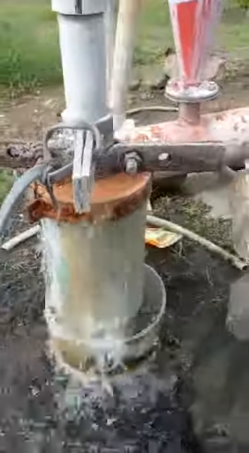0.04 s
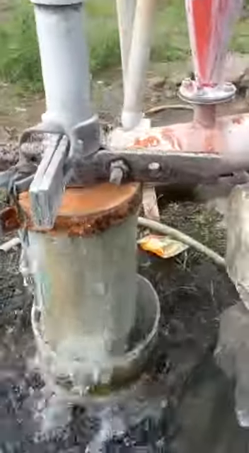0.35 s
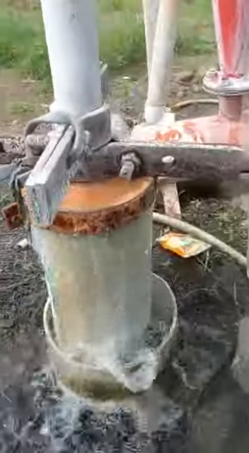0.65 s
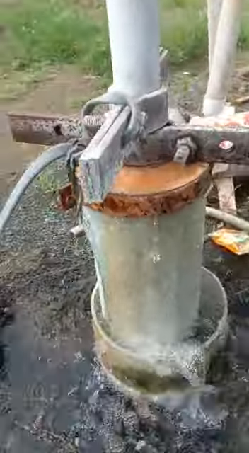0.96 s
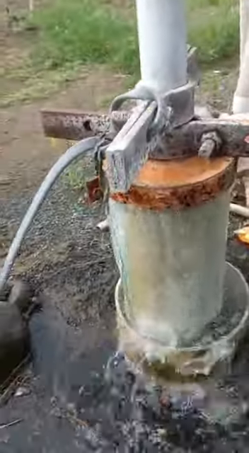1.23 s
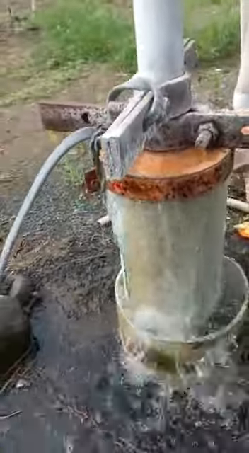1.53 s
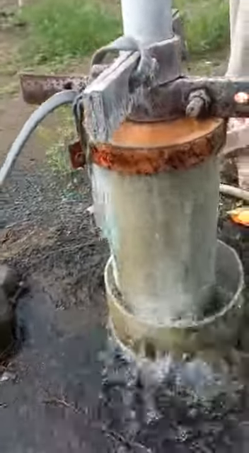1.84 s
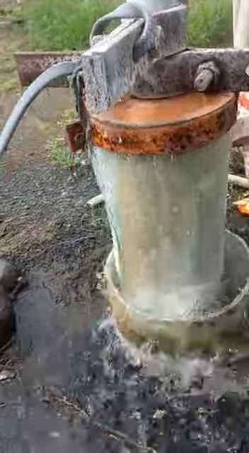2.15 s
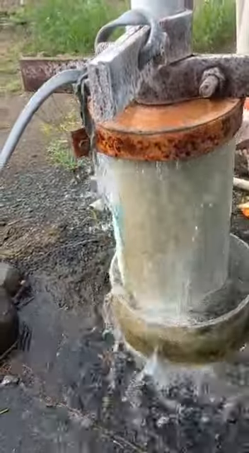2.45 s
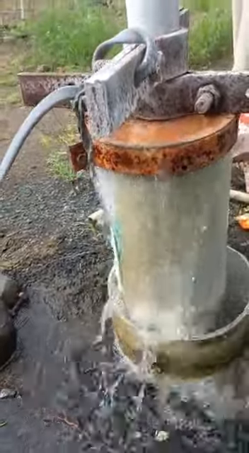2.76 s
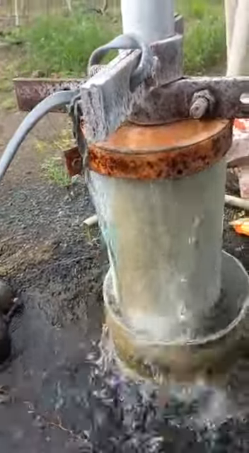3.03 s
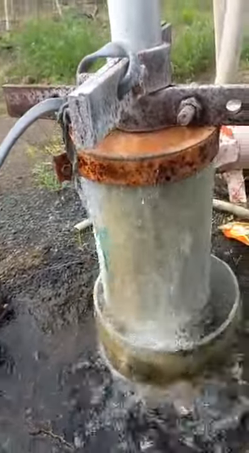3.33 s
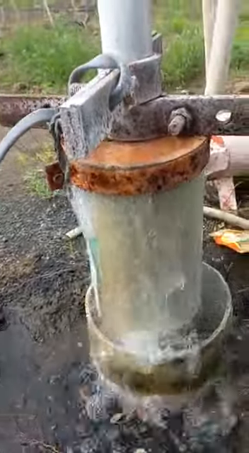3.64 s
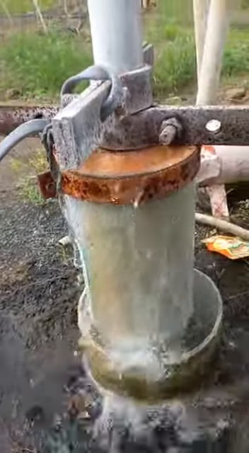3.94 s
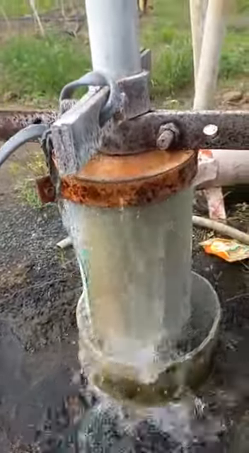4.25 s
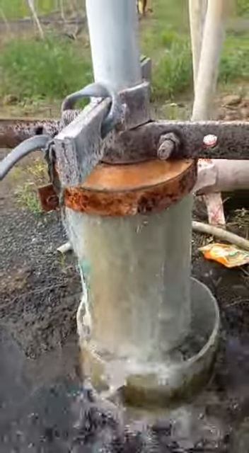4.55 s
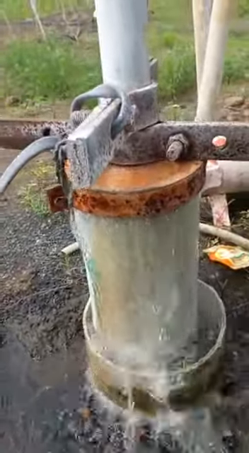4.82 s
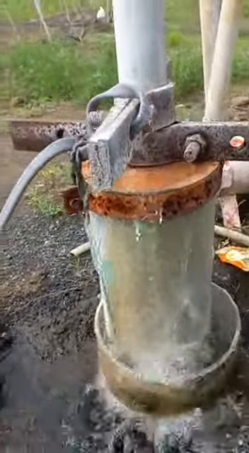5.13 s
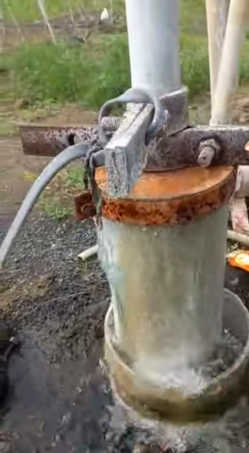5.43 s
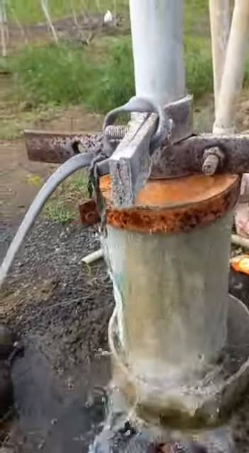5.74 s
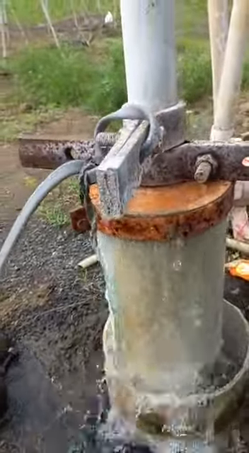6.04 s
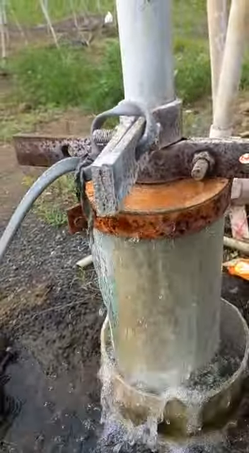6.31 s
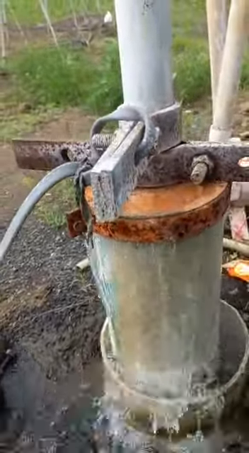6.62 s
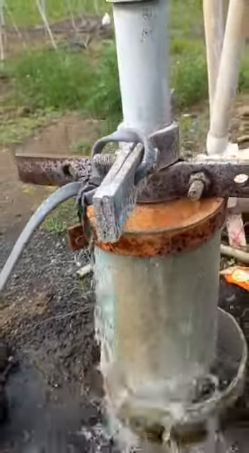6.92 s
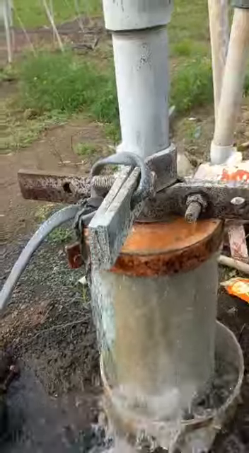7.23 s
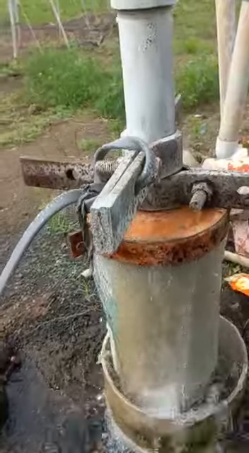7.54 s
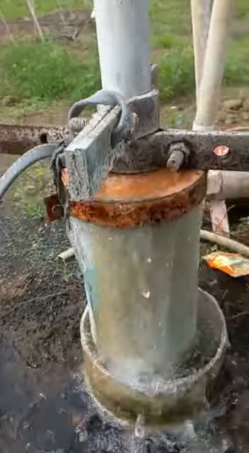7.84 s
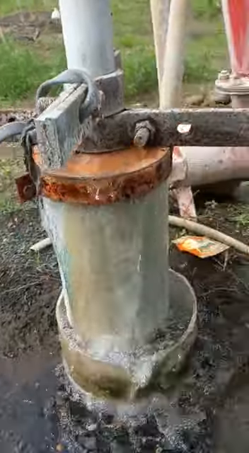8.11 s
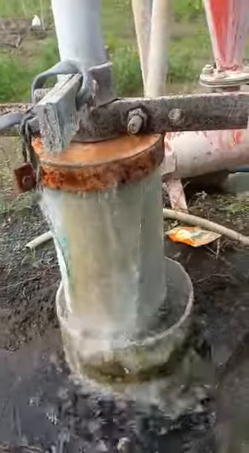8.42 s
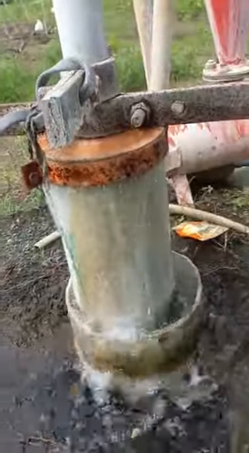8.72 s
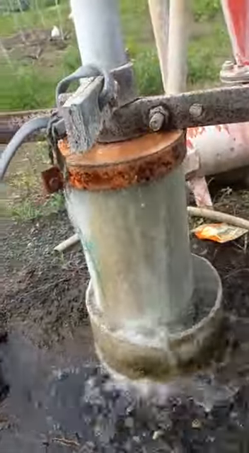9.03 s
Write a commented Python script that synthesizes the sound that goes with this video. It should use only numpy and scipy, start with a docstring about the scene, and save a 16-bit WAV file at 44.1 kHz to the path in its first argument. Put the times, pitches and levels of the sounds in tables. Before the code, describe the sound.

Water overflows from a well pipe and splashes onto wet ground for the whole nine seconds or so, close to a hand-held microphone outdoors. It is a bright, irregular trickle and spatter with small surges, over a soft hollow gurgle from the collar at the pipe's foot. Heavier splashes, sharp drips and small ringing bubbles are scattered throughout, clustering around 2 seconds and between 4 and 5.5 seconds. Wind buffets the microphone with low rumble and dull thumps in the first half second, then drops back. It returns strongly at about 2.4 seconds, flutters on through the middle, and hits hard again around 5.7 to 6.1 seconds. Weaker gusts follow until about 7.5 seconds. From 7 seconds to the end, low plops and brighter bubbles become more frequent as the splashing continues.

```python
"""Water wells out under the cap of a borewell casing, gurgles in the collar at its foot and spills onto
wet ground. It lands in uneven slugs that burst into droplets and trap small bubbles; now and then a fat
drop slaps down. Each impact is a broadband click, and each bubble rings at a pitch set by its size.
Outdoors, turbulent gusts buffet the two ports of a hand-held microphone that moves about the pipe."""
import sys
import numpy as np
from scipy import signal
from scipy.fft import rfft, irfft, next_fast_len
from scipy.io import wavfile
from scipy.ndimage import uniform_filter1d, map_coordinates

SR = 44100
rng = np.random.default_rng(int(sys.argv[2]) if len(sys.argv) > 2 else 0)


def generate_wav(sig):
    """Save sig (samples, or channels by samples) to the path in sys.argv[1] as 16-bit PCM at SR."""
    pcm = np.round(np.clip(np.atleast_2d(sig).T, -1, 1) * 32767).astype(np.int16)
    wavfile.write(sys.argv[1], SR, pcm)


N = 404397

# Levels in the tables are relative: each source adds its own gain.
# the spill swells and fades as the microphone moves: t/s, splash/dB, spatter/dB, spray/dB
SPILL_LEVELS = [(0.0, -49.5, -51, -57.5), (0.43, -47, -50, -53.5), (0.89, -52.5, -53, -60.5),
                (1.17, -52.5, -53, -57.5), (1.48, -47, -48.5, -51.5), (2.02, -41.5, -42.5, -51.5),
                (2.73, -47, -47.5, -51.5), (3.45, -47, -48.5, -54), (4.11, -43.5, -46, -50.5),
                (4.49, -47, -46, -53), (5.26, -44.5, -45.5, -50.5), (5.72, -44.5, -46.5, -52.5),
                (6.49, -49.5, -51.5, -56.5), (7.07, -49.5, -50.5, -55), (7.46, -45, -46.5, -51),
                (8.66, -44, -45.5, -52.5), (9.17, -46, -44.5, -51.5)]
# water surges over the rim of the collar: t/s of the crest, rise/dB
RIM_SURGES = [(0.26, 2.5), (0.69, 1.5), (0.969, 4), (1.464, 5.5), (1.89, 1.5), (2.04, 4.5), (2.13, 3),
              (2.22, 2), (2.45, 3), (2.74, 5), (3.07, 6), (3.14, 5.5), (3.63, 0), (3.93, 1.5), (4.041, 3.5),
              (4.11, 2.5), (4.37, 0), (4.63, -1.5), (4.96, 1), (5.11, 5), (5.36, 7), (5.628, 3.5),
              (5.78, 3), (6.14, 5), (6.58, -2), (6.82, 6), (6.922, 5.5), (7.1, 6.5), (7.26, 4.5),
              (7.52, 2.5), (7.6, 2.5), (7.88, 0.5), (7.99, 2.5), (8.21, 2.5), (8.42, 0.5), (8.685, 4),
              (9.0, 2.5), (9.08, 3)]
# spectrum of splashing water: f/Hz, level/dB
SPLASH_SPECTRUM = [(500, -27), (1000, 2), (1350, 7), (1600, 2.5), (2200, 1.5), (3100, 0), (4000, -9.5),
                   (6700, -8), (7500, -13), (8100, -13), (9500, -3), (12800, 6), (14500, 1), (16000, 6)]
# how much sooner the spill reaches the right port: t/s, lead/ms
SPILL_LEAD = [(0, 0.1), (1, 0.1), (2, 0.038), (3, 0.066), (4, 0.1), (5, 0.08), (6, 0.13), (7.3, 0.15),
              (8, 0.11), (9.17, 0.072)]
# the reflection off the wet ground comes sooner as the microphone dips: t/s, delay/ms
ECHO_DELAY = [(0, 1.7), (1.2, 2.3), (1.75, 1.96), (2.3, 1.74), (3.3, 1.85), (5.1, 2.02), (6.8, 1.65),
              (7.9, 2.08), (9.17, 1.67)]
# heavy slugs slop into the puddle and trap air: t/s, splash/dB, bubble level/dB, bubble f/Hz
HEAVY_SLUGS = [(0.951, -21, -28, 2880), (1.2416, -22, -41, 1720), (1.713, -39, -26, 3030),
               (1.8014, -14, -26, 2930), (1.923, -18, -29, 2350), (2.023, -18, -25, 3450),
               (2.21, -29, -23, 2900), (2.2283, -32, -28, 2285), (2.819, -19, -43, 1505),
               (3.623, -17, -26, 1750), (3.667, -26, -34, 2390), (3.827, -38, -31, 1910),
               (4.238, -12, -27, 2150), (4.409, -40, -26, 3650), (4.695, -30, -27, 3400),
               (4.915, -11, -35, 1760), (5.022, -29, -21.5, 3300), (5.109, -27, -25, 3260),
               (5.502, -12, -38, 3180), (7.175, -39, -31, 2000), (7.601, -28, -31, 1460),
               (7.863, -21, -27, 1760), (8.197, -29, -31, 2590), (8.292, -33, -28, 2640),
               (8.328, -35, -24.5, 2920), (8.418, -35, -26, 2840), (8.52, -30, -25.5, 3180),
               (8.691, -29, -25, 2500), (8.753, -17.5, -28, 1910), (8.813, -26, -25, 2700),
               (9.002, -22, -23, 3120), (9.068, -12, -35, 1950)]
# fat drops slap down: t/s, treble/dB, body/dB, lead at the right port/ms
FAT_DROPS = [(0.2609, -49.0, -25, -0.09), (0.3645, -31, -34, 0.09), (0.6853, -34, -43, 0.11),
             (0.97, -32, -34, 0.11), (1.3781, -30, -32, 0.09), (1.668, -46, -33, 0.07),
             (1.88, -23, -23, 0.18), (1.9091, -30, -26, 0.05), (2.0087, -25, -36, 0.07),
             (2.0238, -21, -20, 0.09), (2.0691, -25, -31.0, 0.07), (2.1162, -24, -29, 0.05),
             (2.1941, -18, -26, 0.05), (2.2324, -29, -25, 0.05), (2.253, -45, -24, 0.05),
             (2.3468, -23, -20, 0.02), (2.5633, -26, -44, 0.32), (2.5959, -26, -41, 0.2),
             (3.0196, -37, -28, 0.14), (3.1248, -27, -32.0, 0.11), (3.3172, -38, -35.0, 0.14),
             (3.409, -28, -46, 0.09), (3.7325, -24.0, -33, 0.09), (4.0242, -14.5, -21, 0.11),
             (4.0468, -24.0, -45.0, 0.0), (4.224, -53.0, -26, 0.09), (4.2619, -25, -49.0, 0.02),
             (4.3208, -37.0, -24, 0.18), (4.3616, -25, -25, 0.16), (4.5593, -57.0, -27.5, 0.11),
             (4.625, -33, -27, 0.09), (4.715, -24.0, -40.0, 0.11), (4.8089, -28, -50.0, 0.09),
             (5.3622, -30, -21, 0.18), (5.4786, -29, -35, 0.09), (5.6198, -28, -29, 0.14),
             (5.6369, -34.0, -27, 0.2), (5.9904, -25, -43.0, 0.11), (6.0767, -29, -34.0, 0.14),
             (6.4238, -40, -45, 0.14), (6.591, -31, -38, 0.14), (6.859, -40.0, -32, 0.14),
             (7.1068, -24, -37, 0.16), (7.325, -25, -29, 0.2), (7.505, -23, -51.0, 0.14),
             (7.682, -22, -30.0, 0.18), (7.8754, -29, -25, 0.09), (7.8963, -51.0, -28, 0.16),
             (7.9846, -18, -27, 0.14), (8.0088, -22.0, -31.0, 0.14), (8.0461, -27, -34, 0.23),
             (8.3448, -31, -32, 0.09), (8.4165, -50.0, -24.0, 0.09), (9.0277, -27, -44, 0.14),
             (9.1396, -30, -32, 0.11)]
# water churns in the collar: t/s, level/dB
CHURN_LEVEL = [(0, -49), (.8, -55.5), (1.3, -52), (1.7, -48.5), (2.1, -44.5), (3, -48.5), (4, -46.5),
               (5, -46.5), (5.6, -50.5), (6.4, -51), (7.2, -52.5), (7.7, -48.5), (8.2, -47.5), (8.7, -44.5),
               (9.17, -47.5)]
# cavity modes of the collar: f/Hz, bandwidth/Hz, level/dB
COLLAR_MODES = [(308.6, 134, -2.5), (524, 64, 1.5), (743, 65, 1), (1021, 37, -0.5), (1513, 70, -7.5),
                (1935, 69, -5.5)]
# big air pockets plop in the collar: t/s, level/dB, f/Hz
AIR_POCKETS = [(0.883, -53, 990), (1.058, -31.5, 1400), (1.084, -32.5, 870), (1.475, -29.5, 780),
               (1.659, -37, 524), (1.801, -51, 1070), (4.096, -26, 1200), (6.384, -28, 1340),
               (7.103, -29.5, 1060), (7.25, -26, 1300), (7.601, -30, 580), (7.645, -31, 1000),
               (7.974, -30.5, 563), (8.153, -32, 730), (8.227, -31, 547), (8.291, -32.5, 524),
               (8.415, -33, 664), (8.519, -39, 708), (8.604, -26, 1020), (8.78, -28, 1030),
               (9.072, -33, 1480)]
# gusts reach the ports: t/s, duration/s, level/dB, depth (extra gain of the low rumble)/dB
WIND_GUSTS = [(-0.04, 0.067, -26.5, -16), (0.029, 0.053, -20.5, -10), (0.105, 0.042, -20.5, -5),
              (0.183, 0.13, -33.5, -4), (0.279, 0.16, -31, -7.5), (0.468, 0.048, -30.5, -9),
              (0.577, 0.05, -51.5, 2), (1.132, 0.057, -43, 1.5), (1.233, 0.09, -48.5, -2),
              (1.357, 0.044, -41, 0), (1.443, 0.14, -52, -4), (1.813, 0.16, -39.5, 1),
              (2.119, 0.071, -34.5, 3), (2.262, 0.027, -31.5, -1), (2.359, 0.17, -25.5, -3.5),
              (2.542, 0.14, -28, -1), (2.735, 0.21, -39, 2), (2.907, 0.29, -35, -6),
              (3.285, 0.32, -34.5, -6), (3.51, 0.29, -31.5, -3), (3.823, 0.11, -30.5, -1.5),
              (3.981, 0.12, -28, -1), (4.133, 0.12, -33, -9), (4.236, 0.052, -27, -6),
              (4.304, 0.11, -30.0, -6), (4.435, 0.15, -31, -8.5), (4.6, 0.15, -37.5, -1),
              (4.834, 0.063, -39, 0), (4.917, 0.14, -34, 1.5), (5.091, 0.062, -26, -8),
              (5.174, 0.14, -38, -2.5), (5.42, 0.19, -32, -2), (5.695, 0.098, -26.5, -3.5),
              (5.795, 0.18, -22, -4.5), (5.994, 0.1, -25, -6), (6.18, 0.086, -43, -4.5),
              (6.386, 0.13, -44.5, -13), (6.684, 0.15, -37.5, -7.5), (6.869, 0.23, -35, -7),
              (7.148, 0.27, -39, -10), (7.382, 0.045, -33.5, 7.5), (7.522, 0.027, -48.5, 7),
              (7.757, 0.04, -59.5, 6), (8.718, 0.076, -45, 6), (8.862, 0.05, -53, 3),
              (9.01, 0.038, -45.5, 4)]
# spectrum of a moderate gust: f/Hz, level/dB
GUST_SPECTRUM = [(25, -9), (45, -11.5), (78, 4), (105, 8.5), (160, 1), (250, 1.5), (380, 2.5), (520, -4),
                 (700, -25), (1000, -24), (1500, -46), (2200, -50)]
# growth of the rumble with the level of the gust: f/Hz, slope/(dB per dB)
RUMBLE_GROWTH = [(30, 0.5), (100, 0.85), (200, 0.99), (400, 1.3), (700, 1.96), (1500, 2)]
# single hard eddies: t/s, level/dB
HARD_EDDIES = [(0.044, -12), (0.058, -1.5), (0.071, 0), (0.079, -5), (0.089, -5), (0.119, -3.5),
               (0.131, -6.5), (0.147, -6.5), (0.206, -11), (0.229, -16.5), (0.399, -14), (0.49, -16),
               (1.171, -31), (2.426, -3), (2.438, -5), (2.469, -5.5), (2.491, -11), (2.503, -12),
               (2.512, -12), (2.528, -17), (2.663, -15), (2.67, -9), (2.882, -13.5), (2.89, -21),
               (3.468, -17.5), (3.506, -14.5), (3.601, -12.5), (3.672, -15), (3.712, -14), (3.739, -8.5),
               (3.889, -12.5), (3.917, -10), (4.034, -12.5), (4.044, -12), (4.063, -14), (4.09, -12),
               (4.112, -15), (4.161, -17), (4.262, -22), (4.279, -21), (4.291, -15), (4.332, -16),
               (4.395, -16), (4.408, -18), (4.95, -18), (5.016, -15), (5.145, -10), (5.462, -16),
               (5.71, -13.5), (5.725, -20), (5.755, -10), (5.783, -5.5), (5.803, -20), (5.831, -1),
               (5.84, -4.5), (5.871, -8), (5.879, -0.5), (5.906, -14), (5.92, -4), (5.931, -8),
               (5.942, -2.5), (5.951, -8), (5.97, -4), (6.022, -8), (6.033, -18), (6.072, -18),
               (6.081, -10), (6.098, -17), (6.119, -19), (6.744, -13.5), (6.787, -19.5), (7.04, -17.5),
               (7.053, -17.5), (7.103, -23.5), (7.407, -27)]


def spill(hollow_hz=1035, ring_hz=3150):
    """Impact on wet ground radiates in three bands by size of drop: ringing splash, spatter, spray."""
    water = colour(patter(), SPLASH_SPECTRUM)
    splash_db, spatter_db, spray_db = spill_levels()
    ringing = rms_one(band(water, 900, 3500, order=4)) + plinks()
    ringing = ground_reflection(ringing, share=.17)
    # the hollow of the collar resonates with the splashes
    ringing = ringing + from_db(7) * resonate(ringing, hollow_hz, 40)
    ringing = ringing + .25 * resonate(ringing, ring_hz, 400)
    splash = (from_db(splash_db + 2) + slug_envelope()) * steady(ringing, .045)
    spatter = from_db(spatter_db + 3.5) * steady(band(water, 3754, 8130, order=4), .1)
    spray = from_db(spray_db + 3) * steady(band(water, 8960, 21000, order=4), .05)
    ticks = from_db(spray_db + .5) * lone_droplets()
    return splash + spatter + pan_right(spray + ticks, .58)


def spill_levels(swell_s=.018, drain_s=.028, ripple_db=.7, ripple_per_s=14):
    """Flow modulates the three band levels (dB): shared surges, and ripples both shared and separate."""
    t = np.arange(0, N, 40) / SR
    surge_db = sum(rise_db * np.exp(-((t - s) / np.where(t < s, swell_s, drain_s)) ** 2)
                   for s, rise_db in RIM_SURGES)
    flow_db = np.interp(np.arange(N) / SR, t, surge_db) + ripple_db * drift(ripple_per_s)
    return [level_db + flow_db + ripple_db * drift(ripple_per_s) for level_db in in_time(SPILL_LEVELS)]


def slugs(per_s, fade_s, trickle):
    """Flow as shot noise of mean 1: lumps of water swell and drain on top of an even trickle."""
    r = np.exp(-2 / (fade_s * SR))
    lumps = signal.lfilter([1], [1, -2 * r, r * r], np.abs(clicks(per_s, spread_db=4)) + 1e-18)
    flow = lumps / lumps.mean() + trickle
    return flow / flow.mean()


def patter(width_ms=.082, fizz_db=-4.5, scatter_db=-4.5):
    """Incoherent sources add: droplets and tiny bubbles at four spots, each with its own flow."""
    lead_ms, = in_time(SPILL_LEAD)
    out = 0
    for offset, weight in [(-.16, .9), (-.0023, .92), (.49, .87), (1.24, .61)]:
        flow = slugs(per_s=45, fade_s=.007, trickle=.9)
        # the smaller the droplet, the higher it ticks
        droplets = sum(resonate(clicks(1100 * flow, spread_db=2), hz, 2660)
                       for hz in (2430, 4650, 10600, 13900))
        fizz = bubbles(flow, 3300, 7600, cycles=35, rise=.04, spread_db=2.8, count=1000, size=450)
        spot = rms_one(droplets) + from_db(fizz_db) * fizz
        out = out + weight * two_ports(spot, lead_ms + width_ms * offset)
    return rms_one(out) + from_db(scatter_db) * scatter(out)


def bubbles(flow, low_hz, high_hz, cycles, rise, spread_db, count, size=1100):
    """A bubble is a damped oscillator: the smaller, the higher, its pitch rising near the surface."""
    when, smallness, strength, life = rng.random((count, 4)).T[:, :, None]
    start = np.searchsorted(np.cumsum(flow) / flow.sum(), when)  # more flow traps more air
    hz = low_hz * (high_hz / low_hz) ** smallness
    t60 = cycles * (.5 + life) / hz
    n = np.arange(size)
    t = n / SR
    onset_db = spread_db * np.minimum(-np.log(1 - strength), 4)
    envelope = from_db(onset_db - 60 * t / t60) * np.sqrt(hz) * (1 - n / size)
    rings = envelope * np.sin(2 * np.pi * hz * t * (1 + rise * t / t60 / 2))
    return rms_one(np.bincount((start + n).ravel(), rings.ravel(), N)[:N])


def plinks(width_ms=.068):
    """Pea-sized bubbles resonate in a dense crowd in the puddle, on both sides of the collar."""
    lead_ms, = in_time(SPILL_LEAD)
    out = 0
    for offset in (-.6, .6, 1.6):
        flow = slugs(per_s=30, fade_s=.02, trickle=2)
        air = bubbles(flow, 1450, 3550, cycles=52, rise=.05, spread_db=2.4, count=1150, size=1000)
        out = out + two_ports(air, lead_ms + width_ms * offset)
    return rms_one(band(out, 880, 2630))


def lone_droplets(width_ms=.094):
    """Droplets strike pipe and gravel; heavy damping leaves small, dry ticks."""
    lead_ms, = in_time(SPILL_LEAD)
    out = 0
    for offset in (-1, .4, 1.5):
        ticks = bubbles(np.ones(N), 5200, 14000, cycles=5, rise=0, spread_db=3.3, count=180, size=80)
        out = out + two_ports(ticks, lead_ms + width_ms * offset)
    return rms_one(colour(band(out, 4600, 15600), SPLASH_SPECTRUM))


def slug_envelope(fade_s=.0057, gain_db=-19.5):
    """Each heavy slug is an impulse: the gain of the splash jumps, then decays exponentially."""
    hits = np.zeros(N)
    for s, splash_db, *_ in HEAVY_SLUGS:
        hits[int(s * SR)] = from_db(splash_db + gain_db)
    decays = signal.lfilter([1], [1, -np.exp(-1 / (fade_s * SR))], hits + 1e-18)
    return uniform_filter1d(decays, size=90)


def puddle_bubbles(gain_db=-4.5):
    """Air entrained by each heavy slug rings brightly in the puddle."""
    trapped = [(s, level_db, hz) for s, _, level_db, hz in HEAVY_SLUGS]
    air = pockets(trapped, cycles=40, apart_s=.005, loss_db=1, count=8)
    lead_ms, = in_time(SPILL_LEAD)
    return from_db(gain_db) * two_ports(band(air, 1300, 5400), lead_ms)


def pockets(rows, cycles, apart_s, loss_db, count):
    """Fragmentation: each air pocket breaks into a quick run of ever fainter bubbles of like size."""
    t = np.arange(2600) / SR
    out = np.zeros(N + SR)
    for (s, level_db, hz), chance in zip(rows, rng.random((len(rows), count, 2))):
        for k, (late, detune) in enumerate(chance):
            at = int((s + apart_s * k * late) * SR)
            pitch = hz * 1.7 ** ((detune - .5) * min(k, 1))
            # the pitch rises as the bubble nears the surface
            ring = np.sin(2 * np.pi * pitch * t * (1 + 2 * t)) * from_db(-60 * t * pitch / cycles)
            out[at:at + len(t)] += from_db(level_db - loss_db * k) * ring
    return out[:N]


def slaps(crack_s=.0003, spatter_s=.003):
    """A brief impact is broadband: a fat drop cracks at one spot and throws spatter all around."""
    t = np.arange(-200, 800) / SR
    crack = np.exp(-np.abs(t) / crack_s)
    spatter = .36 * np.exp(-np.maximum(t, -2.5 * t) / spatter_s)
    treble, body = np.zeros((2, 2, N))
    for s, treble_db, body_db, lead_ms in FAT_DROPS:
        direct = rng.choice([-1, 1], len(t)) * (crack + 1.15 * spatter)
        diffuse = .6 * spatter * rng.choice([-1, 1], (2, len(t)))
        burst = np.array([np.roll(direct, round(lead_ms * SR / 1000)), direct]) + diffuse
        at = int((s - .003) * SR)
        treble[:, at:at + len(t)] += burst * from_db(treble_db + 4.5)
        body[:, at:at + len(t)] += burst * from_db(body_db + 5)
    return band(treble, 10500, 14200) + band(body, 4000, 7600, order=3)


def gurgle(impacts_per_s=1400, glug_db=-1.5):
    """Cavity resonance: water plunging into the collar excites its modes, and larger bubbles glug."""
    flow = slugs(per_s=45, fade_s=.015, trickle=.83)
    shared = clicks(impacts_per_s * flow, spread_db=3)
    separate = np.array([clicks(impacts_per_s * flow, spread_db=3) for port in range(2)])
    impacts = shared + from_db(1.5) * separate
    hollow = sum(from_db(db) * resonate(impacts, hz, width) * (-1) ** k
                 for k, (hz, width, db) in enumerate(COLLAR_MODES))
    glugs = bubbles(flow, 443, 1120, cycles=26, rise=.1, spread_db=2.4, count=900)
    churn = band(rms_one(hollow) + from_db(glug_db) * glugs, 329, 2460, order=4)
    level_db, = in_time(CHURN_LEVEL)
    return from_db(level_db) * steady(churn, .14)


def plops(gain_db=-7):
    """Large volumes of air resonate low: big pockets glug in the collar."""
    air = pockets(AIR_POCKETS, cycles=23, apart_s=.0046, loss_db=.5, count=4)
    return from_db(gain_db) * band(air, 460, 2200)


def ground_reflection(x, share):
    """Comb filtering: the direct sound interferes with an echo whose delay follows the microphone."""
    delay_ms, = in_time(ECHO_DELAY)
    n = np.arange(N)
    return x + share * np.array([np.interp(n - delay_ms * SR / 1000, n, port) for port in x])


def scatter(x, t60_s=.055, size=2048):
    """Diffuse reflection off pipe and ground; the paths keep changing as water and microphone move."""
    padded = np.pad(x, ((0, 0), (size, 2 * size)))
    out = np.zeros((2, N + 4 * size))
    window = np.sin(np.pi * np.arange(2 * size) / (2 * size))
    decay = from_db(-60 * np.arange(size + 1) / SR / t60_s)
    for at in range(0, N + size, size):
        paths = rng.standard_normal((2, size + 1)) * decay
        block = padded[:, at:at + 2 * size] * window
        out[:, at:at + 3 * size] += signal.fftconvolve(block, paths, axes=1)
    return rms_one(out[:, size:size + N])


def wind(moderate_db=-34, lull_db=-58, gain_db=2.5, deep_low_hz=45, deep_high_hz=240):
    """Turbulence, mostly separate at each port: a stronger gust sheds smaller eddies and sounds higher."""
    gust_db, depth_db = wind_strength()
    lumps_db = 4 * drift(50.5) + 3.5 * np.array([drift(56), drift(64)])
    lumps = steady(from_db(lumps_db), .095)
    # two noises, taken in turn by the half-octave bands
    noises = lumps * (rng.standard_normal((2, 2, N)) + .34 * rng.standard_normal((2, 1, N)))
    edges_hz = 19.5 * 2 ** np.arange(.5, 7.5, .5)
    out, power = 0, 0
    for k, (low, high) in enumerate(zip(edges_hz, edges_hz[1:])):
        hz = np.sqrt(low * high)
        eddies = band(noises[k % 2] * from_db(2.5 * drift(27)), low, high, order=3)
        eddies = from_db(at_hz(GUST_SPECTRUM, hz)) * np.sqrt(hz) * steady(eddies, .3)
        power += np.mean(eddies ** 2)
        growth_db = at_hz(RUMBLE_GROWTH, hz) * (gust_db - moderate_db)
        deep_db = depth_db / (1 + (hz / deep_high_hz) ** 4 + (deep_low_hz / hz) ** 2)
        out = out + eddies * from_db(growth_db + deep_db)
    # in a lull the air hardly stirs the ports
    stirring = 1 / (1 + from_db(2 * (lull_db - gust_db)))
    return from_db(moderate_db + gain_db) * stirring * out / np.sqrt(power)


def wind_strength(attack_s=.034, release_s=.039, calm_db=-67, flutter_db=.63, flutter_per_s=38):
    """Powers add: gusts on top of calm air give the wind's fluttering level and its depth, in dB."""
    t = np.arange(0, N, 40) / SR
    power, depth = from_db(calm_db) ** 2, 0
    for start, length, level_db, depth_db in WIND_GUSTS:
        rise = np.clip((t - start) / attack_s, 0, 1)
        fall = np.exp(-np.maximum(t - start - length, 0) / release_s)
        gust = (from_db(level_db) * rise * fall) ** 2
        power = power + gust
        depth = depth + gust * depth_db
    gust_db, depth_db = in_time(np.transpose([t, 10 * np.log10(power), depth / power]))
    return gust_db + flutter_db * drift(flutter_per_s), depth_db


def buffets(swell_s=.0023, gain_db=-4, moderate_hz=340, moderate_db=-22):
    """A hard eddy is a pressure pulse on the ports: a dull thump, higher the harder it is."""
    t = np.arange(1500) / SR
    out = np.zeros((2, N))
    for s, level_db in HARD_EDDIES:
        noise = rng.standard_normal((2, len(t))) + .45 * rng.standard_normal(len(t))
        push = noise * t * np.exp(-t / swell_s)
        hz = moderate_hz * from_db(.15 * (level_db - moderate_db))
        thump = band(push, hz / 2.1, hz * 1.55, order=3)
        at = int(s * SR)
        out[:, at:at + len(t)] += thump / np.abs(thump).max() * from_db(level_db + gain_db)
    return out


def outdoor_rumble(level_db=-71.5):
    """Faint ambient noise, low in pitch and uncorrelated between the ports."""
    return from_db(level_db) * rms_one(band(rng.standard_normal((2, N)), 63, 230, order=3))


def two_ports(x, lead_ms):
    """Path difference: the left port hears a source a little later than the right."""
    left = map_coordinates(x, [np.arange(N) - lead_ms * SR / 1000], order=3)
    return np.array([left, x])


def pan_right(x, db):
    """Level difference: the left port loses what the right gains."""
    return x * from_db([[-db], [db]])


def clicks(per_s, spread_db):
    """Poisson impacts of either sign: many small, a few large."""
    at = np.flatnonzero(rng.random(N) < per_s / SR)
    sizes = from_db(spread_db * np.minimum(rng.exponential(1, N)[at], 4))
    return np.bincount(at, sizes * np.sign(rng.random(N)[at] - .5), N)


def drift(per_s):
    """Low-passed noise of unit power, changing at about the given rate."""
    r = np.exp(-40 * np.pi * per_s / SR)
    slow = signal.lfilter([1], [1, -2 * r, r * r], rng.standard_normal(N // 20 + 2002))[2000:]
    return np.interp(np.arange(N) / 20, np.arange(len(slow)), rms_one(slow))


def resonate(x, hz, width_hz):
    """Two-pole resonance with unit peak gain."""
    r = np.exp(-np.pi * width_hz / SR)
    feedback = [1, -2 * r * np.cos(2 * np.pi * hz / SR), r * r]
    return signal.lfilter(np.array([1, 0, -1]) * (1 - r * r) / 2, feedback, x + 1e-18)


def band(x, low_hz, high_hz, order=2):
    """Maximally flat band-pass."""
    sos = signal.butter(order, [low_hz, min(high_hz, .45 * SR)], "band", fs=SR, output="sos")
    return signal.sosfilt(sos, x + 1e-18)


def colour(x, spectrum):
    """Zero-phase filtering by a smooth spectrum."""
    size = next_fast_len(N + 4096)
    gain = from_db(at_hz(spectrum, np.fft.rfftfreq(size, 1 / SR)))
    return irfft(rfft(x, size) * gain, size)[..., :N]


def steady(x, span_s):
    """Unit power over every short span: the grain stays, slow swells go."""
    power = uniform_filter1d(np.mean(np.atleast_2d(x) ** 2, axis=0), max(int(span_s * SR), 64))
    return x / np.sqrt(np.abs(power) + 1e-12)


def at_hz(points, hz):
    """Interpolate a spectrum on a log-frequency axis."""
    f, value = np.transpose(points)
    return np.interp(np.log(hz + 1e-3), np.log(f), value)


def in_time(rows):
    """Interpolate each column of a curve, sample by sample."""
    s, *columns = np.transpose(rows)
    return [np.interp(np.arange(N) / SR, s, c) for c in columns]


def rms_one(x):
    """Scale to unit power."""
    return x / np.sqrt(np.mean(x ** 2) + 1e-20)


def from_db(db):
    """Decibels to amplitude ratio."""
    return 10 ** (np.asarray(db) / 20)


def scene():
    """Superposition: water slightly to the right, wind on the ports, a faint outdoor rumble."""
    water = spill() + gurgle() + plops() + puddle_bubbles() + slaps()
    return pan_right(water, .5) + wind() + buffets() + outdoor_rumble()


def record(dry, ceiling=.7, cutoff_hz=15950):
    """Soft saturation rounds off the hardest gusts; a steep low-pass cuts the top."""
    rounded = ceiling * np.tanh(dry / ceiling)
    return signal.sosfilt(signal.ellip(12, .1, 80, cutoff_hz, fs=SR, output="sos"), rounded)


dry = scene()
out = record(dry)
generate_wav(out)
```